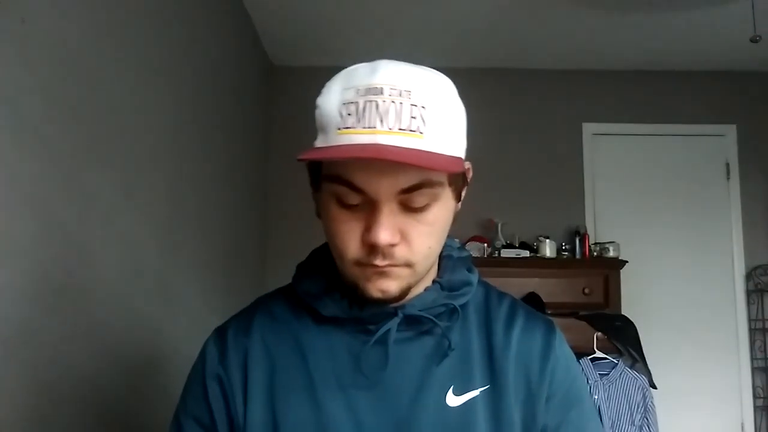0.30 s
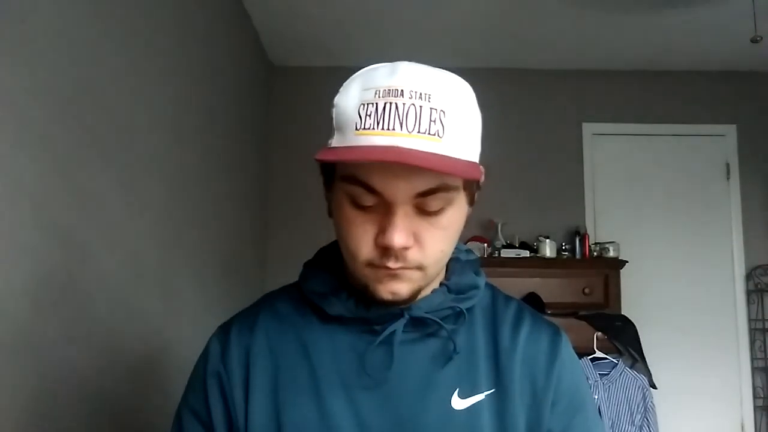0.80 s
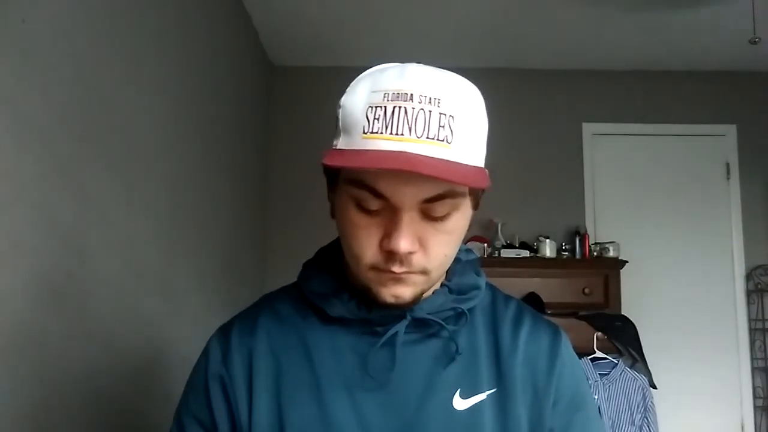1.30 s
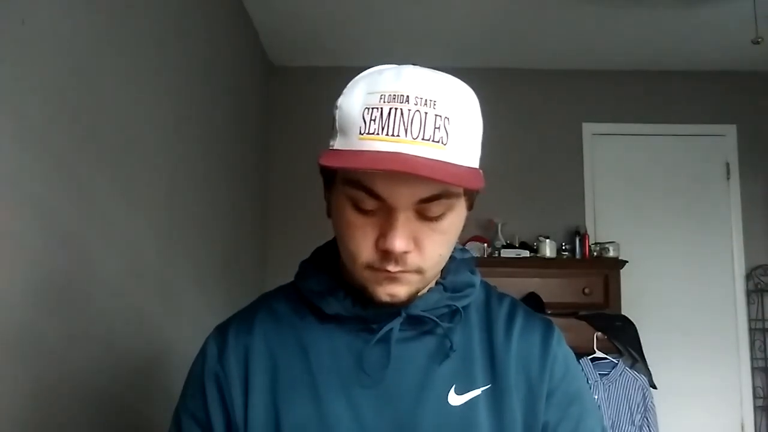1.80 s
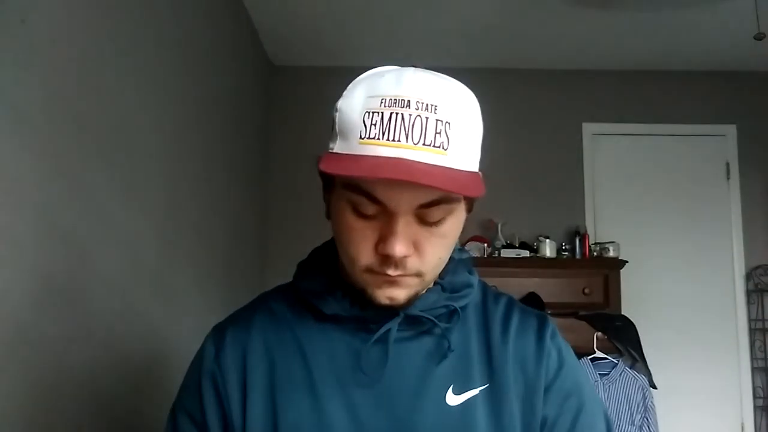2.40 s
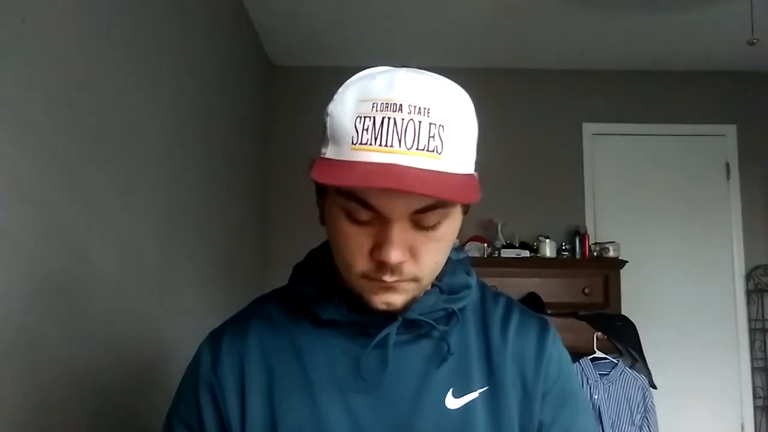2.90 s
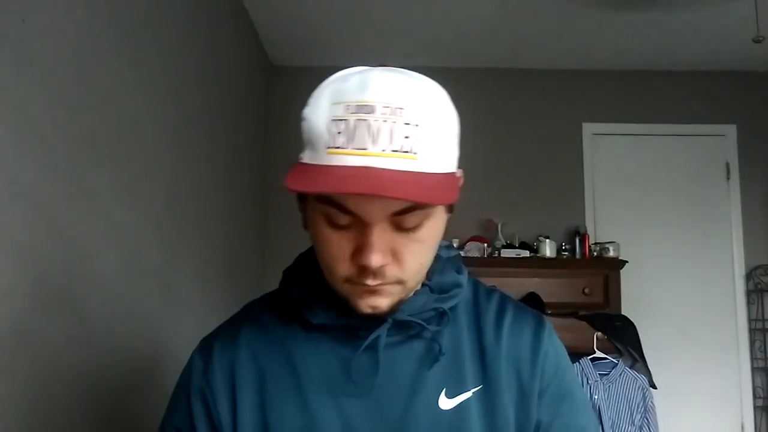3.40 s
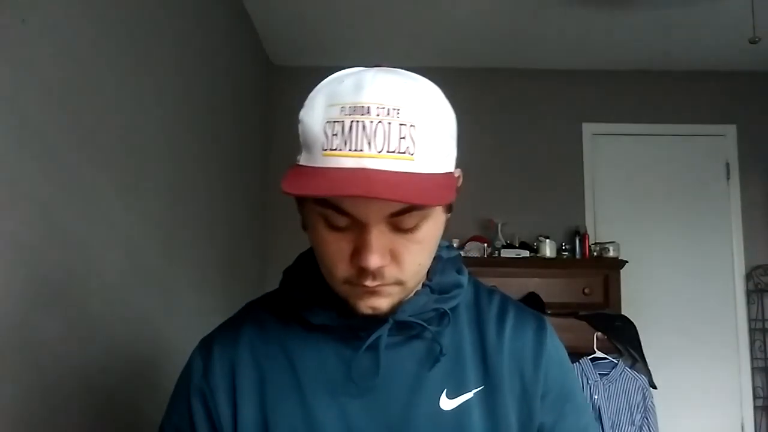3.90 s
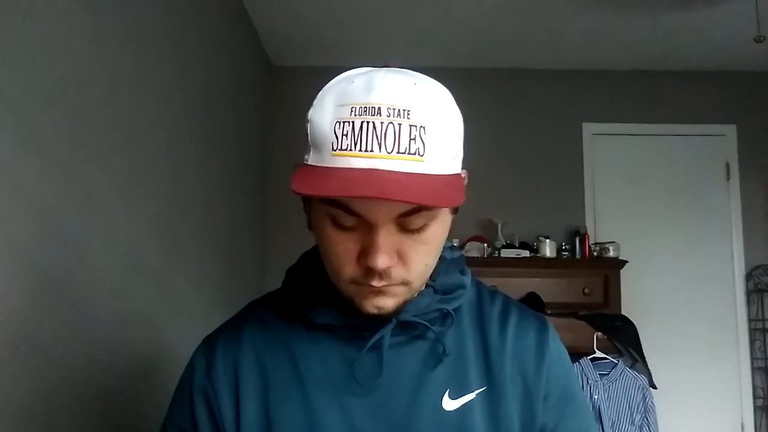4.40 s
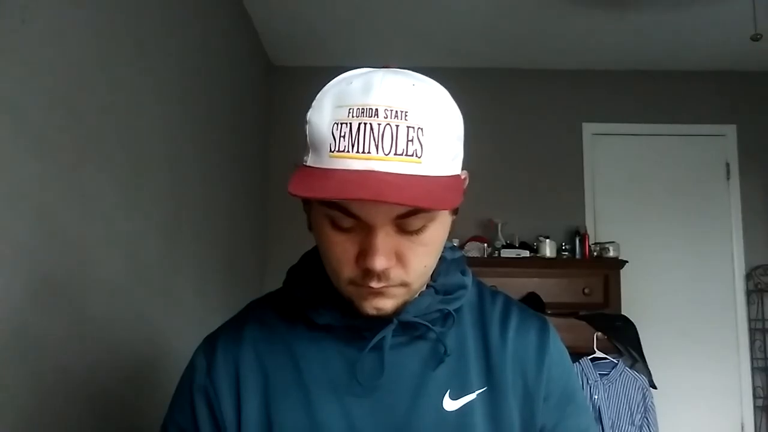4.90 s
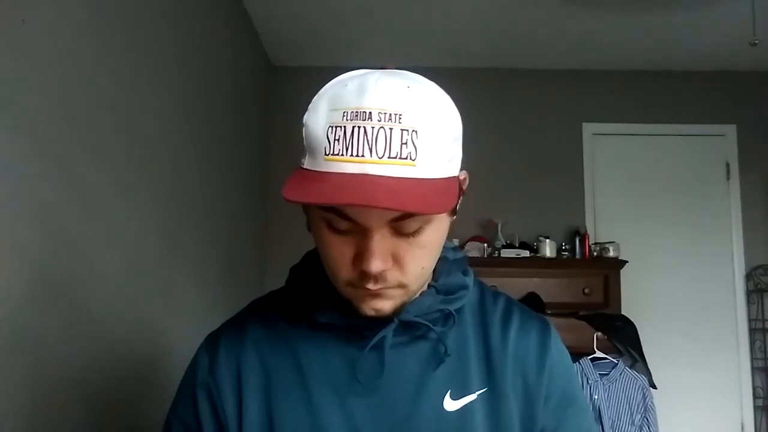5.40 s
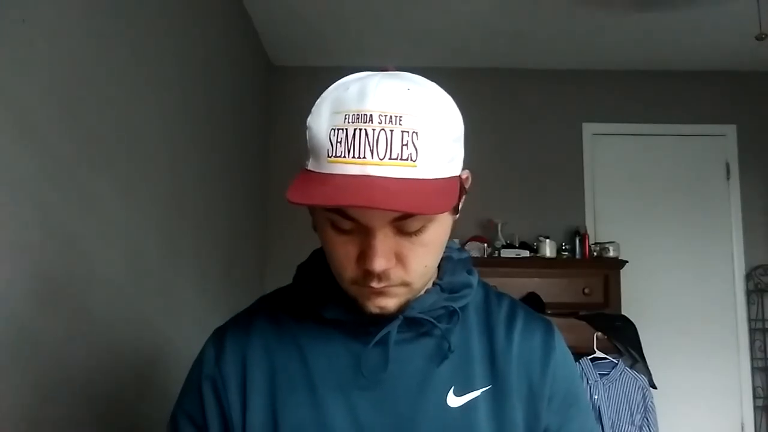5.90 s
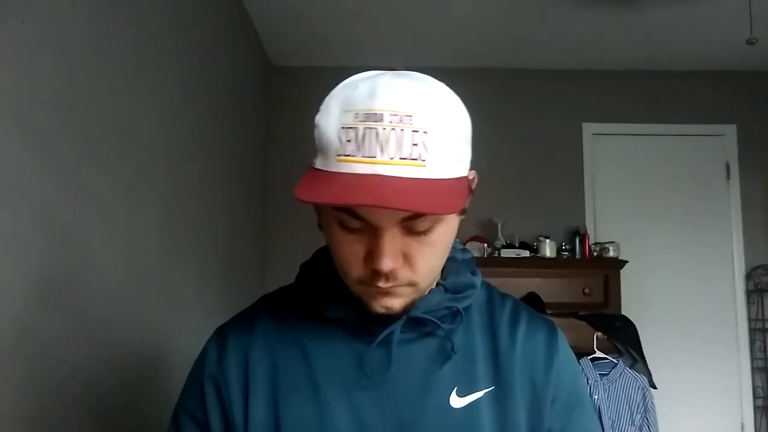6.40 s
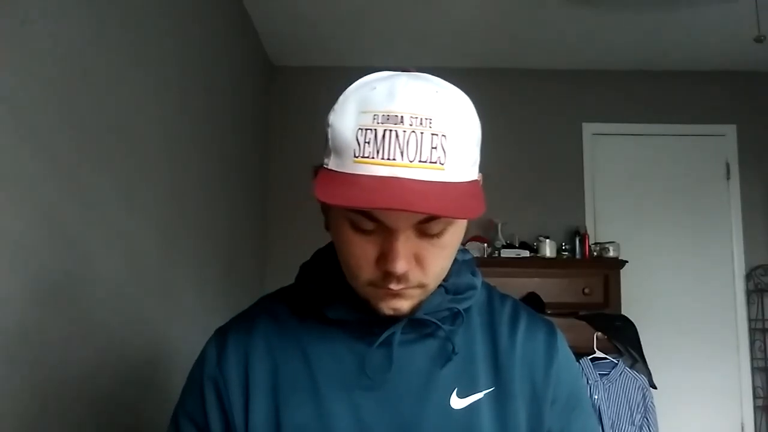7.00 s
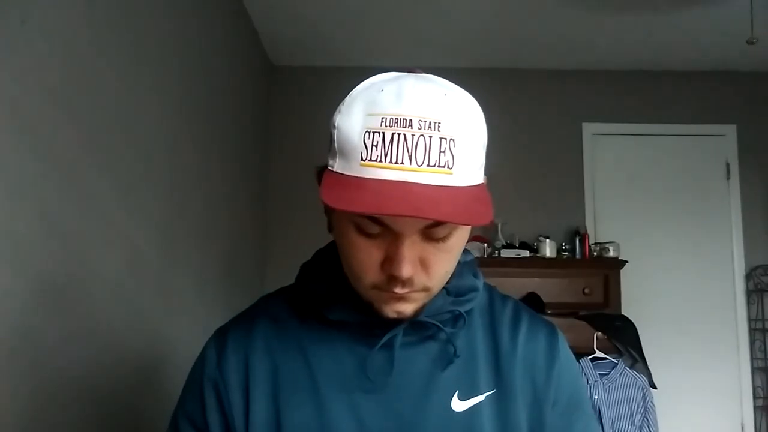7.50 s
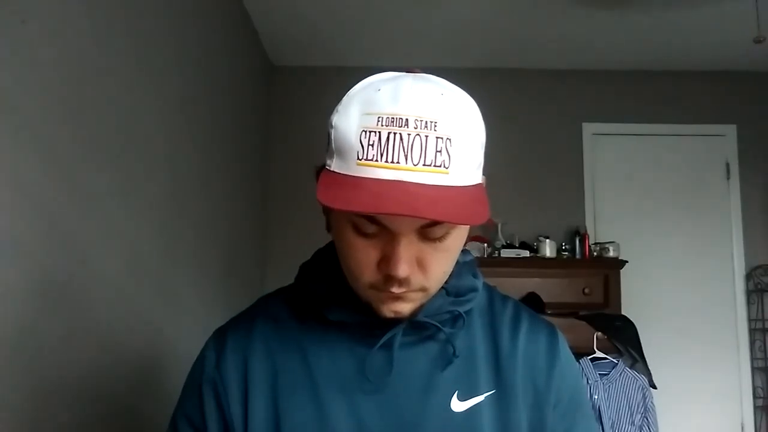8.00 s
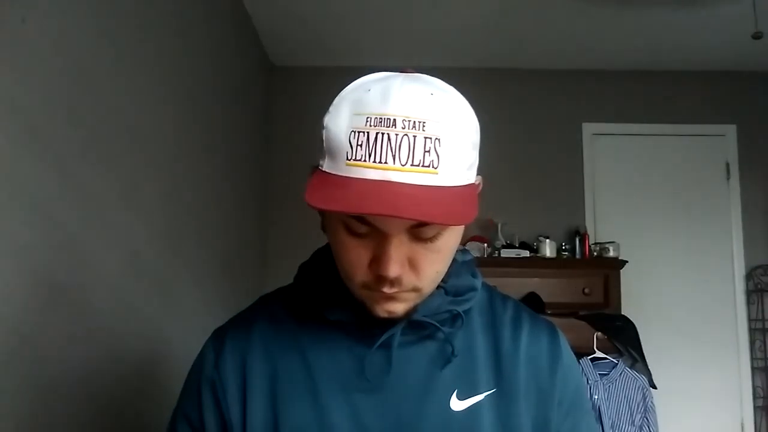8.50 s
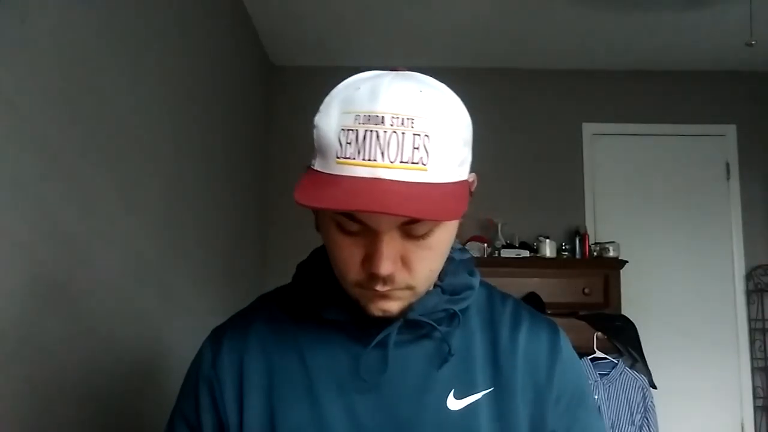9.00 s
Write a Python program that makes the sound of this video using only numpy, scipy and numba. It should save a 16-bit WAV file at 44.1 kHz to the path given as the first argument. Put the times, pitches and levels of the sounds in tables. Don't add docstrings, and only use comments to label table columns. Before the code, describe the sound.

Close, dry paper noise: fingers drag over an envelope, fibres rip in dense tiny bursts, and creases buckle with hard little cracks. Short pauses separate the pulls. The tearing is busiest from two to seven and a half seconds, then fades to small crinkles. Behind it are a soft room hum that swells late, distant traffic rumble, tiny ticks on the right and a very faint electronic whine early on. The left channel is crisp, the right muffled with slight hiss.

```python
import sys
import numpy as np
from scipy import signal
from scipy.fft import rfft, irfft, next_fast_len
from scipy.io import wavfile
from scipy.ndimage import uniform_filter1d
from numba import njit

SR = 44100
rng = np.random.default_rng(int(sys.argv[2]) if len(sys.argv) > 2 else 0)


def volts_from_decibels(level):
    exponent = np.asarray(level, float) / 20
    return 10 ** exponent


def unload_wav(signal):
    wavfile.write(
        sys.argv[1],
        SR,
        np.round(np.clip(np.atleast_2d(signal).T, -1, 1) * 32767).astype(np.int16),
    )


N = 407043

# start_s, held_s, scrape_db, flex_above_scrape_db, sheet_hz
DRAGS = [(-0.02, 0.33, -68.5, -6, 4000), (0.297, 0.16, -46.5, -10, 1900), (1.097, 0.1, -51, -20, 1694),
         (1.24, 0.077, -58.5, -5, 3410), (1.439, 0.43, -53, -9, 2400), (2.191, 0.13, -42, -11.5, 2370),
         (2.68, 0.11, -62.5, -13.5, 1910), (2.907, 0.23, -50.5, -8, 2560), (3.2, 0.2, -57, -19, 2790),
         (3.62, 0.23, -58, -3, 2530), (3.9, 0.065, -59, -1.5, 2600), (4.25, 0.25, -58.5, -3.5, 2140),
         (4.55, 0.098, -65, -9, 2480), (4.786, 0.022, -51.5, -8, 2800), (4.848, 0.049, -46.5, -7, 1720),
         (5.16, 0.23, -68.5, -5, 2100), (5.34, 0.03, -60, -22, 3000), (5.377, 0.018, -42, -3, 3260),
         (5.43, 0.2, -42.5, -12, 3740), (5.91, 0.3, -61, -17, 3260), (6.291, 0.12, -51.5, -4, 4630),
         (6.6, 0.17, -41, -12, 3770), (6.906, 0.19, -52.5, -7, 3380), (7.2, 0.41, -58, -0.5, 2530),
         (8.19, 0.53, -64, -25, 3171), (8.58, 0.045, -66.5, -20, 2500), (8.875, 0.24, -64.5, -30, 2011)]
# peak_s, fall_20db_s, scrape_db, flex_above_scrape_db, sheet_hz
PULLS = [(0.451, 0.1049, -43, -1.5, 2620), (1.224, 0.11, -38, -10.5, 2400), (1.331, 0.4, -63.5, 4.5, 1310),
         (1.781, 0, -50.5, -13, 2121), (1.921, 0, -66.5, 13, 1180), (2.351, 0.34, -40.5, -13.5, 2380),
         (2.558, 0.09, -41, -9, 3740), (3.383, 0.03, -43, -5, 2750), (3.5, 0.2, -40, -12.5, 2600),
         (3.837, 0.05, -38.5, -8, 2860), (4.098, 0.18, -43, -7.5, 2440), (4.202, 0.04, -41, -10, 2760),
         (4.291, 0.26, -56.5, -31, 2561), (4.484, 0.09, -44.5, -10.5, 3400),
         (4.631, 0.15, -55.5, -22, 1901), (4.832, 0.01, -40, -7.4, 3200), (4.991, 0.06, -54, -17, 2521),
         (5.063, 0.09, -42, -9, 2980), (5.589, 0.19, -37.5, -15.5, 3520), (6.181, 0.2, -62, -18.4, 2061),
         (6.574, 0.22, -36.5, -9, 3180), (7.569, 0.31, -39.5, -9, 3800), (7.881, 0.1, -63, 2, 2110),
         (8.181, 0.1, -58.5, -25, 2500), (8.311, 0.14, -55, -3, 4000), (8.411, -0.2, -60, -25, 2500),
         (9.051, 0.16, -55, -40, 1841), (9.161, 0.2, -56.5, -37, 1900)]
# start_s, fall_20db_s, scrape_db, flex_above_scrape_db
FLICKS = [(0.03, 0.5, -61, -3), (0.733, 0.17, -56.5, -25), (2.137, 5, -43.5, -8.5), (2.81, 2, -58, -31.5),
          (2.86, 0.1, -56, -32.5), (3.017, 0.13, -50, 5), (3.17, 0.14, -49, -5), (5.405, 0.14, -63, 20.5),
          (5.908, 0.25, -50, -8), (6.05, -4, -64, -22), (8.166, 8, -58.5, -23), (8.528, 0, -55, -29),
          (8.879, 0.2, -59.5, -28)]
# time_s, scrape_db
GRIP = [(0, -64), (.6, -63.5), (.95, -75), (1.9, -71), (2.1, -82), (2.7, -73.5), (4.6, -66), (4.75, -82),
        (5.0, -70), (5.28, -82), (5.85, -80), (6.2, -64), (7.85, -59), (8, -84), (8.2, -69.5), (8.62, -72),
        (8.75, -90), (9.23, -87.5)]
# time_s, peak_db, decay_s
SNAPS = [(0.037, -44, 0.056), (0.42, -26.5, 0.012), (0.438, -34, 0.015), (0.449, -31.5, 0.015),
         (1.109, -48, 0.034), (1.2205, -30, 0.015), (1.2238, -17, 0.0085), (1.452, -45, 0.094),
         (1.561, -36, 0.063), (1.813, -46, 0.02), (1.938, -54, 0.04), (2.128, -48, 0.03),
         (2.1365, -38, 0.03), (2.141, -28.5, 0.11), (2.873, -50, 0.02), (2.918, -49, 0.04),
         (2.936, -38, 0.057), (3.0148, -29.5, 0.022), (3.1697, -36, 0.03),  (3.218, -40, 0.02),
         (3.448, -40.5, 0.031), (3.6385, -38, 0.02), (3.6629, -34.5, 0.026),  (3.768, -47, 0.032),
         (3.8205, -33, 0.033), (3.929, -45, 0.02), (3.9676, -45, 0.021), (4.382, -51.5, 0.018),
         (4.397, -42.5, 0.027), (4.438, -41, 0.02), (4.4644, -33, 0.024), (4.4812, -27.5, 0.0211),
         (4.6345, -44.5, 0.02), (4.6705, -41.5, 0.021), (4.7895, -47, 0.017),  (4.8235, -43.5, 0.037),
         (5.347, -44, 0.037), (5.3873, -32, 0.02), (5.4095, -31, 0.02), (5.91, -40, 0.036),
         (6.0557, -42, 0.02), (6.3233, -54, 0.027), (6.39, -40, 0.02), (6.9631, -38.5, 0.0206),
         (7.112, -53, 0.02), (7.215, -43, 0.027), (7.302, -43, 0.037), (7.385, -64, 0.01),
         (7.435, -52, 0.02), (7.8164, -42, 0.037), (8.1765, -54, 0.017), (8.1825, -51.5, 0.02),
         (8.291, -47, 0.02), (8.319, -45, 0.02), (8.541, -52.5, 0.02), (8.888, -55, 0.05)]
# time_s, peak_db, panel_hz, decay_s
BUCKLES = [(0.396, -34.5, 1080, 0.027), (0.409, -34.5, 1100, 0.022), (0.419, -28.5, 1190, 0.029),
           (0.437, -32, 3900, 0.02), (0.447, -27.5, 1600, 0.02), (0.452, -33, 4240, 0.03),
           (0.464, -33.5, 1700, 0.02), (1.198, -44, 3280, 0.024), (1.208, -36, 4560, 0.05),
           (1.229, -44, 1100, 0.012), (1.299, -41, 1470, 0.026), (1.85, -45.5, 1140, 0.03),
           (1.942, -51.5, 1180, 0.056), (2.138, -33.5, 1390, 0.089), (2.144, -42, 4200, 0.04),
           (2.625, -38, 1270, 0.02646),   (2.97, -32, 1240, 0.033), (2.986, -30.5, 2040, 0.03),
           (3.016, -22.5, 2250, 0.045), (3.023, -36, 3170, 0.03), (3.037, -35, 1580, 0.037),
           (3.171, -44.5, 1550, 0.03),  (3.524, -31.5, 1480, 0.023), (3.64, -45, 3470, 0.023),
           (3.659, -39.5, 3500, 0.023), (3.84, -49, 1200, 0.02), (4.077, -40, 1170, 0.049),
           (4.089, -38.5, 3460, 0.031),  (4.481, -45, 3391, 0.03), (4.863, -40.5, 1710, 0.02),
           (5.076, -39, 1371, 0.03), (5.394, -43, 1160, 0.023), (5.4084, -23, 2180, 0.02),
           (5.415, -34, 4000, 0.03), (5.428, -37, 2400, 0.045), (5.428, -48, 493, 0.032),
           (5.912, -40.5, 526, 0.035),  (6.579, -30, 3100, 0.027), (6.964, -28, 1860, 0.088),
           (7.105, -34.5, 2280, 0.075), (7.143, -37.5, 2000, 0.043), (7.2138, -37.5, 1300, 0.017),
           (7.224, -51, 524, 0.045), (7.383, -34, 2030, 0.024)]
# pitch_hz, level_db
FIBRE_TONE = [(1500, -53), (3500, -6), (6000, -2.5), (9000, 2), (13000, 2), (16500, 2)]
# pitch_hz, level_db
SHEET_TONE = [(200, -0.5), (450, 4), (1100, 2.5), (2000, -4.5), (3500, -3.5), (6000, -7.5), (12000, -15)]
# time_s, peak_db, ring_hz
TICKS = [(0.143, -63, 5670), (0.22, -65, 4910), (0.303, -59, 5300), (0.579, -61, 5460), (0.792, -72, 5440),
         (0.98, -65, 5010), (1.078, -68, 5170), (1.204, -50, 4870), (1.225, -50, 5030), (1.381, -60, 5100),
         (1.494, -72, 4900), (1.572, -51, 4800), (1.68, -56, 5130), (1.888, -67.5, 5250),
         (1.987, -66, 5060), (2.091, -65, 5660), (2.571, -53, 5570), (2.847, -69.5, 5680),
         (3.308, -64, 5800), (4.399, -64, 4720), (4.598, -60, 5870), (5.145, -64, 5370), (5.296, -66, 5580),
         (5.771, -59, 4970), (5.881, -63, 5800), (6.05, -64, 5000), (6.156, -68, 5720), (6.233, -66, 5000),
         (7.252, -67, 5800), (7.298, -63, 5700), (7.334, -55, 4400), (7.442, -58, 5740),
         (7.99, -62.5, 5700), (8.264, -67, 5650), (8.602, -74, 4670), (8.697, -68, 5600),
         (8.859, -77, 5310), (8.951, -62.5, 5130)]
# time_s, drone_db
DRONE = [
    (0, -71.5),
    (5.65, -78.5),
    (5.8, -65),
    (6.4, -65),
    (6.55, -51),
    (7.42, -49),
    (7.55, -57),
    (8.3, -59),
    (9.23, -64.5),
]
# peak_s, drone_db, octave_db
GUSTS = [(0.1, -63.5, -53), (0.55, -63.5, -59), (1.17, -64, -57), (1.55, -66, -55.5), (1.698, -58, -55.5),
         (1.92, -64, -57.5), (2.63, -58.5, -65), (2.92, -60, -72), (3.3, -62.5, -59.5), (3.55, -62, -63),
         (3.749, -67.5, -57), (3.95, -66, -56), (4.08, -61, -54), (4.361, -61, -49), (4.6, -91, -63),
         (4.75, -78, -64.5), (5.002, -70, -56.5), (5.17, -73, -56), (5.45, -73, -61), (5.77, -60, -56),
         (5.999, -68.5, -61.5), (6.15, -67.5, -68), (6.38, -58.5, -55), (6.7, -50.5, -60.5),
         (7.102, -65, -59), (7.3, -66, -52.5), (7.452, -64, -57), (7.902, -57, -50.5), (8.3, -57.5, -54.5),
         (8.6, -58, -77)]
# pitch_hz, level_db_per_hz
AIR_TONE = [(21, -35), (36, 4.5), (129, 1.5), (376, -12), (511, -10), (992, -20), (1350, -26.5),
            (2900, -34.5), (4360, -45), (6720, -47), (12100, -57), (16000, -40)]
# pitch_hz, share
AIR_SHARED = [(60, 1), (300, .7), (1000, 0.039), (4000, 0.11)]
# start_s, length_s, level_db
WHINES = [
    (0.09, 0.35, -62.5),
    (.47, 0.04246, -72),
    (2.35, 0.457, -60.5),
]
# multiple, level_db
WHINE_ORDERS = [(2, -16), (3, -11), (4, -7), (5, -15), (7, -16), (10, -19), (12, -19), (14, 0)]
# pitch_hz, level_db
RIGHT_TONE = [(50, -1), (110, -2.5), (600, -5), (3000, -1), (6000, -2), (7500, -5), (10000, -11),
              (16000, -16)]
# pitch_hz, rarity_in_spreads_of_chance
MUTE_LEFT = [(1200, 1.8), (2500, .95), (4000, .55), (6000, .5), (8000, 1), (11000, 1.9), (13500, 1.4),
             (15500, .5)]
MUTE_RIGHT = [(1200, 2.2), (3000, 1.4), (4500, 1), (6500, .5), (15000, .4)]

ROOM_T60_S, ROOM_DB = 0.16, -1.5


def rustle():
    scrape, flex, sheet_hz, uneven_db = hands()
    uneven_db = np.clip(uneven_db, 0, 6)
    fibre_power = scrape * bursts(1000, 11.0, uneven_db)
    fibre = room(fibre_power, ROOM_DB + 2.0, 0.38 * ROOM_T60_S, right_db=-20)
    sheet_power = flex * bursts(250, 16.0, 1.16 * uneven_db)
    push = room(sheet_power, ROOM_DB, ROOM_T60_S, right_db=-8)
    sheet = []
    for side in push:
        low_ring = svf(side, sheet_hz, 0.72)
        high_ring = svf(side, 1.86 * sheet_hz, 0.5)
        sheet.append(0.22 * side + low_ring + 0.48 * high_ring)
    return volts_from_decibels(-3.5) * fibre, volts_from_decibels(10.5) * np.array(sheet)


def hands():
    drag_rise_s, drag_fall_s, drag_uneven_db = 0.018, 0.074, 1.5
    pull_rise_share, pull_round, pull_uneven_db = 0.65, 1.276, 1
    flick_rise_s, flick_hz, flick_uneven_db = 0.0076, 2000, 1.5
    rest_flex_db, rest_hz = -80.5, 2400
    t = np.arange(0, N / SR + 0.002, 0.001)
    strokes = []
    for s, held, *rest in DRAGS:
        strokes.append((s + drag_rise_s, drag_rise_s, held, drag_fall_s, 1, drag_uneven_db, *rest))
    for s, fall, *rest in PULLS:
        strokes.append((s, pull_rise_share * fall, 0, fall, pull_round, pull_uneven_db, *rest))
    for s, fall, *rest in FLICKS:
        strokes.append((s + flick_rise_s, flick_rise_s, 0, fall, 1, flick_uneven_db, *rest, flick_hz))
    strokes = np.array(strokes)
    strokes[:, [1, 3]] = np.clip(strokes[:, [1, 3]], 0.005, 0.6)
    top, rise, held, fall, bend, uneven_db, db, flex_db, hz = np.transpose(strokes)[..., None]

    away = np.maximum((top - t) / rise, 0) + np.maximum((t - top - held) / fall, 0)
    scrape = volts_from_decibels(2 * np.maximum(db - 20 * away ** bend, -200))
    flex = scrape * volts_from_decibels(2 * flex_db)
    all_scrape, all_flex = scrape.sum(axis=0), flex.sum(axis=0)
    rest = volts_from_decibels(2 * rest_flex_db)
    log_hz = ((flex * np.log(hz)).sum(axis=0) + rest * np.log(rest_hz)) / (all_flex + rest)
    uneven = (scrape * uneven_db).sum(axis=0) / all_scrape
    grip_db = np.interp(t, *np.transpose(GRIP))
    controls = [settle(all_scrape, -28.5, grip_db, t[1]), settle(all_flex, -13, rest_flex_db, t[1]),
                np.exp(log_hz), uneven]
    return [np.interp(np.arange(N) / SR, t, c) for c in controls]


def settle(power, creep_db, rest_db, step_s):
    p = np.exp(-2 * np.log(1000) * step_s / 1)
    creep = signal.lfilter([1 - p], [1, -p], power)
    return power + volts_from_decibels(2 * creep_db) * creep + volts_from_decibels(2 * rest_db)


def bursts(per_s, fade_ms, uneven_db):
    when, size = rng.random(N), rng.exponential(size=N)
    power = (when < per_s / SR) * volts_from_decibels(2 * uneven_db * np.minimum(size, 3.0))
    power = signal.lfilter([1], [1, -np.exp(-2000 / (fade_ms * SR))], power)
    return power / (uniform_filter1d(power, size=6000) + 1e-9)


def creases():
    snaps = room(blows(SNAPS, crack_db=8), ROOM_DB - 3.0, 0.82 * ROOM_T60_S, right_db=-52)
    s, _, hz, _ = np.transpose(BUCKLES)
    latest = np.maximum(np.searchsorted(s, np.arange(N) / SR) - 1, 0)
    panel_hz = hz[latest]
    push = room(blows(BUCKLES, crack_db=5.5), ROOM_DB - 1.5, 1.14 * ROOM_T60_S, right_db=-3.5)
    rings = []
    for side in push:
        thud = 0.36 * np.minimum(1200 / panel_hz, 1) * side
        low_ring = svf(side, panel_hz, 0.28)
        high_ring = svf(side, np.minimum(1.48 * panel_hz, 9000), 0.28)
        rings.append(thud + low_ring + 0.41 * high_ring)
    return volts_from_decibels(-7) * snaps, volts_from_decibels(10) * np.array(rings)


def blows(table, crack_db):
    crack_s, desk_s, desk_db = 0.0036, 0.0068, -9
    crack_growth = 0.12
    power, t = np.zeros(N + 8192), np.arange(8192) / SR
    crack = volts_from_decibels(2 * crack_db) * np.exp(-(2 * t / crack_s - 1) ** 4)
    crack = crack + volts_from_decibels(2 * desk_db) * np.roll(crack, int(desk_s * SR))
    onset = np.minimum(t / 0.002, 1)
    for s, db, *_, t60 in table:
        fade = np.exp(-2 * np.log(1000) * t / np.clip(t60, 0.008, 0.15))
        sharp = crack * volts_from_decibels(2 * crack_growth * (db + 28.5))
        power[int(s * SR):][:8192] += volts_from_decibels(2 * db - 9.5) * (fade + sharp) * onset
    return power[:N] * volts_from_decibels(2.5 * walk(600))


def room(power, wet_db, t60, right_db):
    direct, *echoes = rng.standard_normal((3, len(power)))
    p = np.exp(-2 * np.log(1000) / (t60 * SR))
    tail = signal.lfilter([1 - p], [1, -p], power)
    near = direct * np.sqrt(power)
    both = np.array([near, volts_from_decibels(right_db) * np.roll(near, 3)])
    return both + volts_from_decibels(wet_db) * np.sqrt(tail) * np.array(echoes)


def ticks():
    tick_s, left_db = 0.0048, -7.5
    out, t = np.zeros(N + 2048), np.arange(-512, 512) / SR
    for s, db, hz in TICKS:
        ring = np.sin(2 * np.pi * hz * t * (1 + 6.0 * t))
        out[int(s * SR):][:1024] += volts_from_decibels(db + 4.0) * np.exp(-(t / tick_s) ** 2) * ring
    return out[512:N + 512] * np.array([[-volts_from_decibels(left_db)], [1]])


def house():
    low_db, octave_db = gusts()
    steady_db = -58
    wander_hz = 5 * np.clip((steady_db - low_db) / 6, 0, 1) * walk(5)
    hum = np.sin(2 * np.pi * np.cumsum(58.65 + wander_hz) / SR)
    rough = unit(band(band(rng.standard_normal(N), 55, 22), 55, 22))
    low = hum + np.clip(0.53 + (steady_db - low_db) / 30, 0.1, 1) * rough
    bass = volts_from_decibels(low_db + 13.5) * low
    octave = unit(band(band(rng.standard_normal(N), 123.4, 24.5), 119.7, 5.9))

    passing_db = -1.5 * np.abs(np.arange(N) / SR - 2.73)
    rumble_db = 2.2 * walk(6) - 60 + 0.81 * (octave_db - octave_db.mean()) + passing_db
    rumble = band(rng.standard_normal(N), 219, 120) + 1.08 * band(rng.standard_normal(N), 445.0, 29)
    drone = volts_from_decibels(octave_db + 10.0) * octave + volts_from_decibels(rumble_db + 5.5) * unit(rumble)
    walls = np.array([drone + np.roll(bass, 55), volts_from_decibels(-4.5) * (drone + bass)])
    return unit(moving_air()) * volts_from_decibels(-52.5 + 1.03 * walk(4)) + walls


def gusts():
    gust_s, calm_db = 0.071, -68.5
    t = np.arange(0, N / SR + 0.02, 0.01)
    s, *peaks_db = np.transpose(GUSTS)[..., None]
    swell = np.exp(-((t - s) / gust_s) ** 2)
    time_s = np.arange(N) / SR
    lows, octaves = (np.interp(time_s, t, (volts_from_decibels(2 * db) * swell).sum(axis=0)) for db in peaks_db)
    fan_db = np.interp(time_s, *np.transpose(DRONE))
    return 10 * np.log10(lows + volts_from_decibels(2 * fan_db)), 10 * np.log10(octaves + volts_from_decibels(2 * calm_db))


def moving_air():
    size = next_fast_len(N)
    hz = np.fft.rfftfreq(size, 1 / SR)
    share = np.clip(read(AIR_SHARED, hz), 0, 1)
    common, *own = rfft(rng.standard_normal((3, size)))
    mixed = np.sqrt(share) * common + np.sqrt(1 - share) * np.array(own)
    return irfft(mixed * volts_from_decibels(read(AIR_TONE, hz)), size)[:, :N]


def circuit():
    t = np.arange(N) / SR
    polls = [(0.725 + k * 0.3215, 0.03, -69) for k in range(17)]
    load = sum(volts_from_decibels(db) * ((t > s) & (t < s + held)) for s, held, db in [*WHINES, *polls])
    whine_hz = 999.7
    comb = sum(volts_from_decibels(db) * np.sin(2 * np.pi * k * whine_hz * t + k * k) for k, db in WHINE_ORDERS)
    hiss = volts_from_decibels(-72) * unit(band(rng.standard_normal(N), 9000, 9000))
    return uniform_filter1d(load, size=400) * volts_from_decibels(2.7 * walk(28)) * comb + hiss


def read(table, hz):
    f, v = np.transpose(table)
    return np.interp(np.log(hz + 1), np.log(f), v)


def colour(x, table):
    size = next_fast_len(N)
    gain = volts_from_decibels(read(table, np.fft.rfftfreq(size, 1 / SR)))
    return irfft(rfft(x, size) * gain, size)[..., :N]


def unit(x):
    return x / np.sqrt(np.mean(x ** 2))


def band(x, hz, width_hz):
    return signal.lfilter(*signal.iirpeak(hz, hz / width_hz, fs=SR), x)


@njit
def svf(x, hz, k):
    y, b, l = np.empty(len(x)), 0., 0.
    for i in range(len(x)):
        g = np.tan(np.pi * hz[i] / SR)
        v = (b + g * (x[i] - l)) / (1 + g * (g + k))
        b, l, y[i] = 2 * v - b, l + 2 * g * v, k * v
    return y


def walk(rate):
    k = int(SR / rate)
    held = np.repeat(rng.standard_normal(N // k + 1), k)
    return 4 / 3 * uniform_filter1d(uniform_filter1d(held, k), k)[:N]


def gate(ports):
    hz, s, z = signal.stft(ports, SR, nperseg=1024, noverlap=768)
    power = np.abs(z) ** 2 + 1e-18
    around = uniform_filter1d(uniform_filter1d(power, size=16, axis=1), size=12, axis=2)
    around_db = 10 * np.log10(around)
    luck = rng.standard_normal((2, len(hz) // 3 + 1, len(s) // 4 + 1))
    luck = uniform_filter1d(uniform_filter1d(luck, size=3, axis=2), size=2, axis=1) * np.sqrt(6)
    luck = luck.repeat(3, axis=1).repeat(4, axis=2)[:, :len(hz), :len(s)]
    keep = luck > -np.array([read(MUTE_LEFT, hz), read(MUTE_RIGHT, hz)])[..., None]
    keep |= (hz < 1200)[:, None]
    keep[0] &= (around_db[0] > -98.5) | (hz < 13500)[:, None]

    frame = np.minimum(np.arange(len(s)), N // 256 - 1)
    right_top_hz = 14700 + 800 * walk(7)[::1024].repeat(4)[frame]
    keep[1] &= keep[0] & (hz[:, None] < right_top_hz)
    keep[1] |= uniform_filter1d(power[1], size=12, axis=1) > volts_from_decibels(2 * around_db[1] + 12)
    treble = power[0, hz > 1000].sum(axis=0)
    sudden = (treble > 6 * np.roll(treble, 3)) | (treble > 3 * uniform_filter1d(treble, size=30))
    keep |= sudden

    local = uniform_filter1d(uniform_filter1d(power, size=7, axis=1), size=3, axis=2)
    contrast = np.clip(power / local, 0, 3) ** 0.27 * volts_from_decibels(-0.9)
    z = z * np.where(sudden | (hz < 250)[:, None], 1, contrast)
    return signal.istft(z * keep, SR, nperseg=1024, noverlap=768)[1][:, :N]


def scene():
    scrape, flex = rustle()
    snaps, rings = creases()
    paper = colour(scrape + snaps, FIBRE_TONE) + colour(flex + rings, SHEET_TONE)
    return paper + house() + ticks()


def band_limit(x):
    return signal.sosfilt(signal.butter(12, 15800, fs=SR, output="sos"), x)


def record(dry):
    left = dry[0] + volts_from_decibels(10) * band(dry[0], 12140, 1130)
    right = circuit() - colour(dry[1], RIGHT_TONE)
    cut = signal.ellip(8, 0.5, 35, 15800, fs=SR, output="sos")
    mix = signal.sosfilt(cut, gate(np.array([left, right])))
    return band_limit(mix)


dry = scene()
out = record(dry)
unload_wav(out)
```